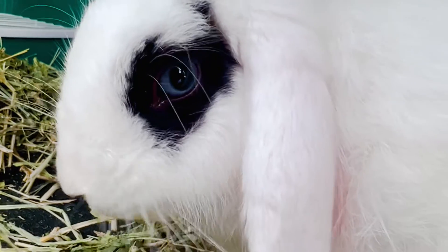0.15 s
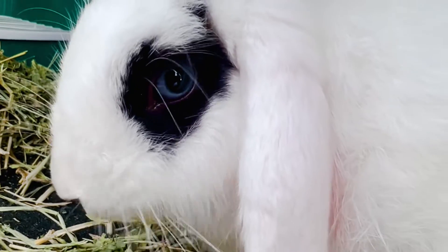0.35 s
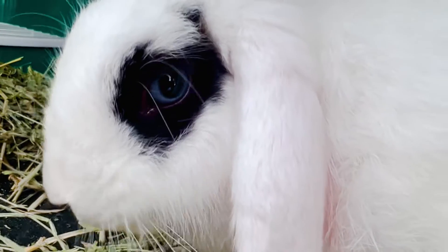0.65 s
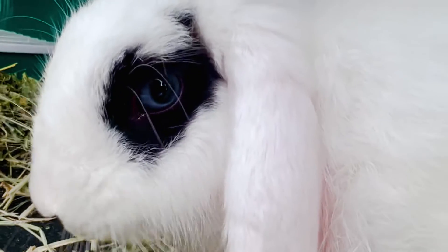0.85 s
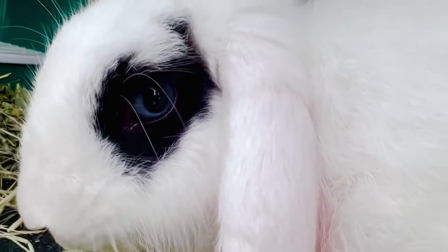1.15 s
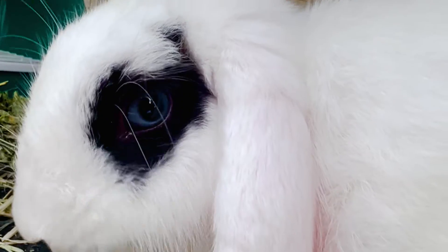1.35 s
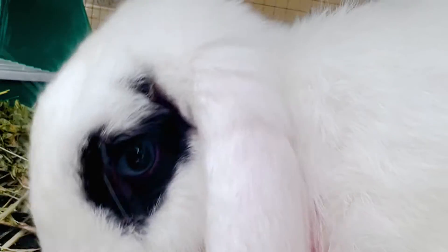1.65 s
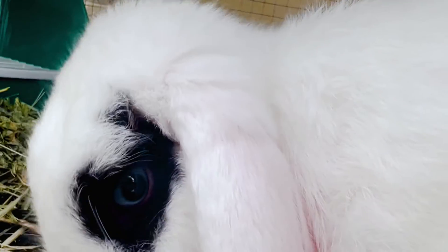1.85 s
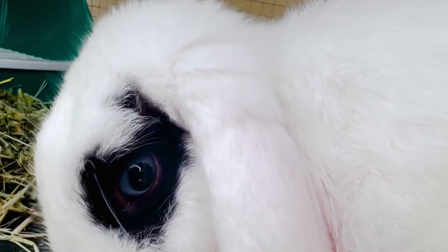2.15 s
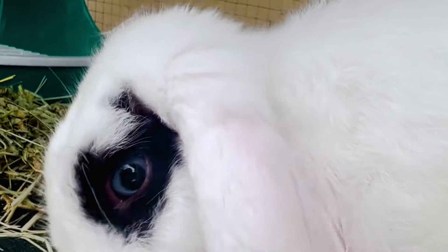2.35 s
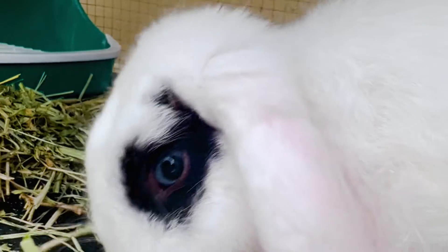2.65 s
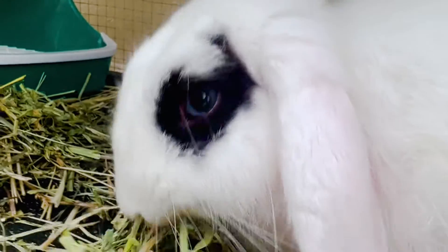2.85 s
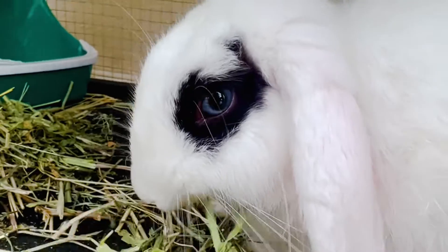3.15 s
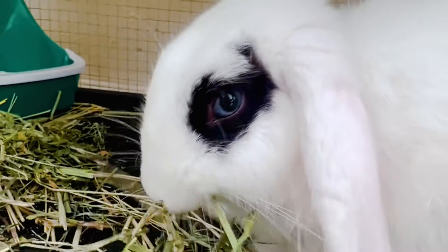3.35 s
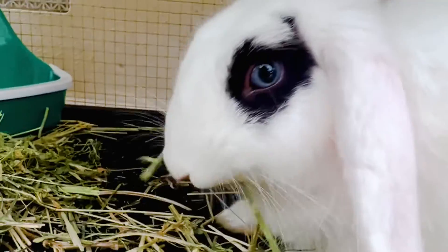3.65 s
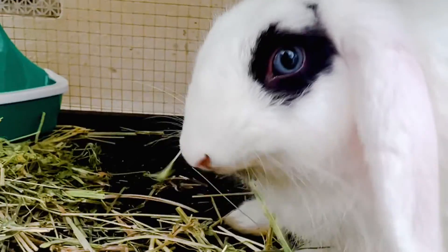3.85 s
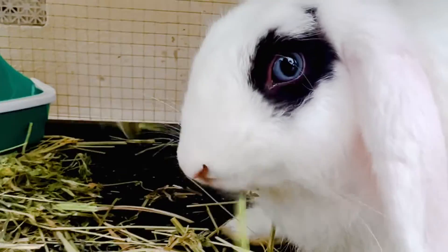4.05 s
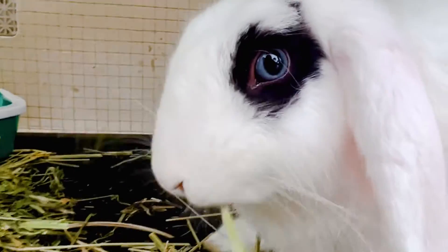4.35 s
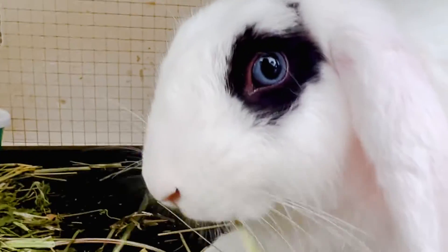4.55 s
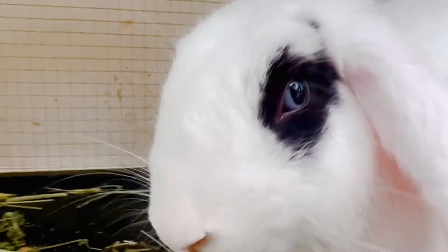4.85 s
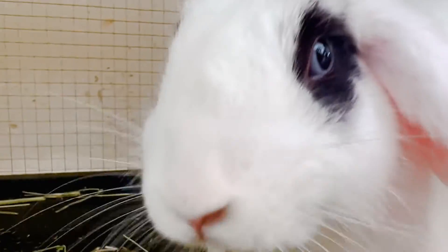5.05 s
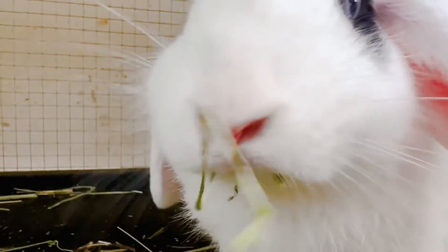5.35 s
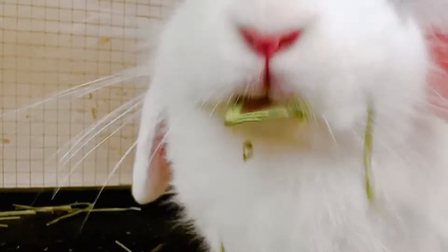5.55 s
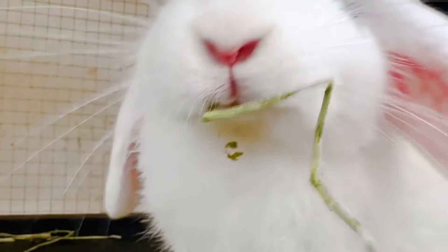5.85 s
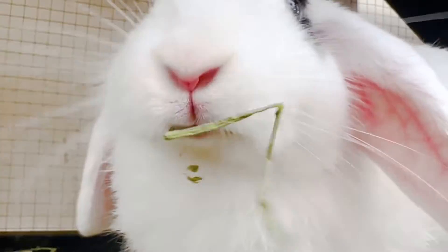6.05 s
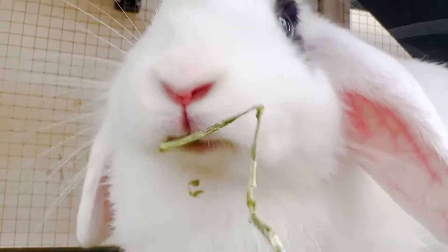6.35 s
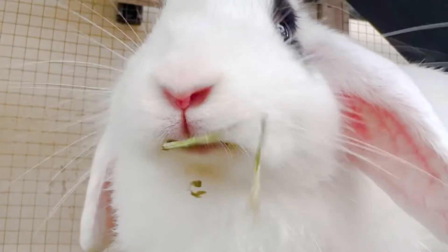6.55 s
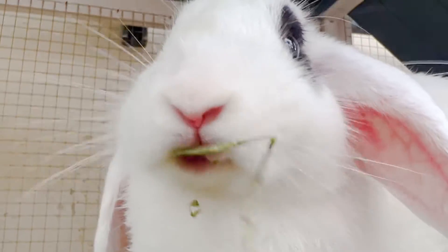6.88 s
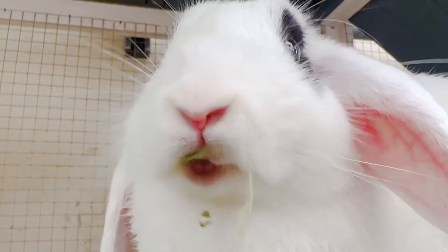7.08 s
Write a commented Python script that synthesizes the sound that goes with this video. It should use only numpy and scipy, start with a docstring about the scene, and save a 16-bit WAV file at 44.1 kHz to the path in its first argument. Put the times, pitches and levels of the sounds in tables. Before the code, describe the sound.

A rabbit chews dry stalks close by with faint, crisp clicks and crunches, growing stronger, over a steady low machine hum and soft airflow.

```python
"""A rabbit chews stalks close by, in stereo: noise bursts through stalk resonances make the snaps,
damped sines the clean cracks, band noise the crunches, dense tiny impulses the rustle of each bite.
Squeaks and breathy swishes are shaped noise; a few taps and thuds are decaying sines.
A machine hums and blows air behind: wandering tones over a narrow drone, rumble, airflow and hiss."""
import sys
import numpy as np
from scipy import signal
from scipy.fft import rfft, irfft, next_fast_len
from scipy.io import wavfile
from scipy.ndimage import uniform_filter1d, map_coordinates

SR = 44100
rng = np.random.default_rng(int(sys.argv[2]) if len(sys.argv) > 2 else 0)


def dump_mix(stems):
    """Bounce the given channels to the path in sys.argv[1] as a 16-bit WAV at rate SR."""
    frames = np.atleast_2d(stems).T  # one column per channel
    limited = np.clip(frames, -1, 1)  # hard clip at full scale
    pcm = np.round(limited * 32767).astype(np.int16)
    wavfile.write(sys.argv[1], SR, pcm)


N = 318402


def amp(db):
    """Decibels to amplitude factor."""
    return 10 ** (np.asarray(db) / 20)


def unit(x):
    """Scale to rms 1."""
    return x / np.sqrt(np.mean(x ** 2) + 1e-20)


def along(points, hz):
    """Interpolate (Hz, value) points on a log frequency axis."""
    point_hz, values = np.transpose(points)
    return np.interp(np.log(hz + 1), np.log(point_hz + 1), values)


def curves(rows):
    """One value per sample for each column after the time."""
    time_s, *columns = np.transpose(rows)
    return [np.interp(np.arange(N) / SR, time_s, column) for column in columns]


def wobble(knots_per_s, count=N):
    """A smooth random curve through normally distributed knots."""
    knots = rng.standard_normal(int(count * knots_per_s / SR) + 4)
    return map_coordinates(knots, [np.arange(count) * knots_per_s / SR])


def filtered(x, response):
    """Multiply the spectrum of x by a complex response of frequency."""
    m = next_fast_len(N + SR // 2)
    return irfft(rfft(x, m) * response(np.fft.rfftfreq(m, 1 / SR)), m)[..., :N]


def resonance(x, hz, width_hz, db):
    """A causal resonance, applied twice for steep skirts; width_hz is that of one pass."""
    def response(f):
        damping = 1j * f * width_hz
        return amp(db) * (damping / (hz * hz - f * f + damping)) ** 2
    return filtered(x, response)


# Stalk resonances: body, dull, main, sharp. Each row: centre in Hz, width in Hz, gain in dB.
FIBRE_MODES = [(2290, 1200, 9), (5580, 5500, 10.5), (8400, 3640, 1), (15600, 2000, 10)]
# Upper body resonance: centre in Hz, width in Hz, gain in dB.
UPPER_BODY_MODE = (3300, 3200, 5.6)
# Each row: time in s, share of the body power drive in its upper resonance (0-1).
UPPER_BODY_SHARE = [(0, 0.3), (2.2, 0.8), (2.4, 0.3), (2.63, 0.7), (3.0, 0.6), (3.33, 0), (3.68, 0.2),
                    (3.97, 1), (5.4, 0.06), (5.7, 0.5), (5.8, 0.2), (5.9, 0.4), (6.31, .6), (6.53, 0.3),
                    (6.75, 0.4), (7.22, 0.85)]


def fibres(drives):
    """Each excitation rings its own stalk resonance; the body moves between a low and a high one."""
    high = np.clip(curves(UPPER_BODY_SHARE)[0], 0, 1)
    body, *rest = drives
    excitations = [body * np.sqrt(1 - high), *rest, body * np.sqrt(high)]
    return sum(resonance(x, *mode) for x, mode in zip(excitations, [*FIBRE_MODES, UPPER_BODY_MODE]))


# Fibre breaks. Each row: start in s, relative level in dB, body part in dB, sharp part in dB.
FIBRE_SNAPS = [(0.35, -68, -2, -40), (0.435, -78, 5, -40), (0.624, -65, 5, -26), (.631, -59, 5, -26),
               (1.0888, -67, 10, -24), (1.096, -63, 7, -26), (1.314, -70, 11, -18), (1.5383, -73, 13, -9),
               (1.7653, -71.5, 11, -20), (1.95, -73, 12, -32), (1.958, -69, 16.5, -29),
               (2.163, -65, 13, -27), (2.177, -72, 22, -23), (2.3264, -65, 9, -16), (2.401, -73.5, 20, -25),
               (2.415, -50.5, -11, -7), (2.498, -62, -2, -32), (2.564, -48, -11, -17),
               (2.622, -67, 15.5, -15), (2.641, -68, 13, -11.5), (2.784, -70, -5, -10),
               (2.806, -62, -10, -15), (2.847, -49.5, -14, -16), (2.898, -51.5, -12, -20),
               (2.931, -55, -16, -16), (2.954, -54, -10, -17.5), (2.981, -53, -1, -23),
               (3.029, -46.5, -17, -17), (3.1046, -64, -10, -11), (3.327, -49, -14, 4),
               (3.3322, -45, -7, -12), (3.346, -55, -6, 3), (3.494, -57, 0, -27), (3.579, -66, -1, -45),
               (3.679, -71.5, 19, -26), (3.7352, -71, 11, -31), (3.966, -53, -1.5, -24),
               (4.66, -67, 4, -25), (4.766, -67, 6, -19), (4.78, -57, -2, -23), (4.874, -68, 0, -15),
               (4.9433, -54, -12, -19), (4.9818, -53, -5, -12), (5.1961, -60, -1, -10),
               (5.3384, -65, 3, 11), (5.402, -66.5, -8, -15), (5.4163, -46.5, -5, -16),
               (5.4356, -68, -9, -7), (5.465, -60, -12, -20), (5.623, -59, -11, -19),
               (5.642, -52, -20, -22), (5.666, -50.5, -12, -14), (5.673, -54, -12, -16),
               (5.702, -63, -9, -13), (5.782, -65, 5.5, -27), (5.8721, -47, -16, -14),
               (5.886, -77, -2, -13), (6.086, -54, -24, -2), (6.091, -42, -24, 2), (6.1006, -69, -8, -18),
               (6.3135, -46.5, -20, -25), (6.522, -54, -7, -33), (6.528, -48.5, -21, -33),
               (6.5617, -58, -10, -47), (6.7328, -55, -1, -25), (6.7421, -63, 2, -24),
               (6.745, -49, -15, -26), (6.756, -46.5, -15, -26), (6.7607, -69, -1, -15),
               (6.974, -54, -3, -22), (7.198, -58.5, -1, -18)]
# Each row: time in s, dull part in dB for a middling snap.
SNAP_DULLNESS = [(0, -7.5), (1.6, -6), (2.1, -22), (3.4, 0), (3.6, -18), (4.8, -18), (5.4, -21),
                 (7.22, -25)]
MIDDLING_DB, DULL_LOSS_DB_PER_DB = -61.5, 0.69  # louder snaps have a weaker dull part


def snaps():
    """Each break is a noise burst that dies in a few milliseconds, the body part more slowly."""
    t = np.arange(900) / SR
    drive = np.zeros((4, N + 900))
    t60_s = np.array([[.014], [.009], [.007], [.007]])  # body, dull, main, sharp
    rise = 1 - np.exp(-t / .002)
    shape = rise * (amp(-60 * t / t60_s) + 0.16 * amp(-60 * t / 0.031))  # with a weak slower tail
    for start_s, db, body_db, sharp_db in FIBRE_SNAPS:
        dull_db = np.interp(start_s, *np.transpose(SNAP_DULLNESS))
        dull_db -= DULL_LOSS_DB_PER_DB * (db - MIDDLING_DB)
        # the fibre tears in uneven steps
        splinters = amp(5 * np.repeat(rng.standard_normal(len(t) // 30), repeats=30))
        burst = unit(rng.standard_normal(shape.shape) * splinters * shape)
        burst *= np.sqrt(np.mean(shape ** 2))
        gains = amp(db + 10.0 + np.array([[body_db], [dull_db], [0], [sharp_db]]))
        first = round(start_s * SR)
        drive[:, first:first + len(t)] += gains * burst
    return fibres(drive[:, :N])


# Dry stalk cracks. Each row: start in s, relative level in dB, low mode in Hz, high mode in Hz,
# high over low in dB.
STALK_TICKS = [(0.5255, -39.5, 3000, 5000, -2), (.6632, -40.5, 5800, 8800, -2),
               (1.3448, -37.5, 6240, 9250, 0), (1.421, -57, 5500, 7000, 0),
               (1.5724, -47.5, 6000, 8900, -11), (1.97, -43, 3800, 7000, -5),
               (2.1768, -36.5, 3200, 5030, -4), (3.302, -49, 5500, 7050, -1), (3.3265, -43, 6200, 8000, 0),
               (4.814, -45, 4610, 9000, 5), (4.842, -54, 4470, 8500, 6), (4.912, -49, 5600, 7420, -3),
               (4.964, -47, 8160, 11000, 3), (5.0165, -55, 4000, 7950, 0), (6.298, -54.5, 5000, 8300, 4.5),
               (6.341, -55, 4340, 8300, 4)]
TICK_T60_S = .0022


def ticks():
    """Dry stalks crack cleanly: two sine modes, damped within a few milliseconds."""
    out, t = np.zeros(N + SR), np.arange(400) / SR
    for start_s, db, low_hz, high_hz, high_db in STALK_TICKS:
        ring = amp(-high_db / 2) * np.sin(2 * np.pi * low_hz * t)
        ring += amp(high_db / 2) * np.sin(2 * np.pi * high_hz * t)
        envelope = amp(db + 2.0 - 60 * t / TICK_T60_S) * (1 - np.exp(-t / .0003))
        out[round(start_s * SR):][:len(t)] += envelope * ring
    return out[:N]


# Molars crush a stalk. Each row: start in s, length in s, pitch in Hz, rms in dB before the swell.
MOLAR_CRUNCHES = [(2.646, .09, 7200, -78.5), (2.791, 0.11, 7800, -70.5), (2.83, .09, 5800, -73),
                  (2.94, .04, 7800, -69), (2.975, 0.03, 3600, -73), (3.02, 0.045, 5600, -76),
                  (3.099, .09, 6200, -79), (3.188, .09, 5600, -83), (6.74, .04, 4300, -75),
                  (3.326, 0.022, 2200, -56), (4.845, .05, 5400, -77), (4.918, .06, 6100, -73),
                  (5.612, 0.036, 8700, -71), (5.667, .04, 5300, -71), (5.674, 0.031, 7000, -77),
                  (5.774, .02, 2500, -66), (5.869, .03, 2480, -65.5), (6.078, .02, 2500, -69),
                  (6.09, 0.023, 4200, -75), (6.31, .02, 3000, -75), (6.515, 0.025, 3800, -80)]
CRUNCH_WIDTH_PER_HZ, CRUNCH_GRAIN_DB = .16, 5  # band width over pitch; unevenness


def crunches():
    """Grainy noise around the pitch of the crushed stalk, under a smooth swell."""
    out, t, f = np.zeros(N + SR), np.arange(4096) / SR, np.fft.rfftfreq(4096, 1 / SR)
    for start_s, length_s, hz, db in MOLAR_CRUNCHES:
        grit = rng.standard_normal(len(t)) * amp(CRUNCH_GRAIN_DB * wobble(300, count=len(t)))
        band = irfft(rfft(grit) / (1 + (2 * (f - hz) / (CRUNCH_WIDTH_PER_HZ * hz)) ** 2))
        swell = np.sin(np.pi * np.clip(t / length_s, 0, 1))
        out[round(start_s * SR):][:len(t)] += amp(db) * swell * unit(band)
    return out[:N]


# Faint rustle between bites. Each row: time in s, crackle control in dB.
HAY_CRACKLE = [(0, -90.5), (.6, -87), (.95, -103), (2, -101), (2.5, -97), (2.75, -86), (3.25, -87),
               (3.45, -83.5), (4.1, -86), (4.5, -79), (4.9, -83.5), (5.1, -83), (5.5, -84), (6, -81),
               (6.3, -85), (7.22, -84)]
# Each row: time of full pressure in s, crackle control in dB, hold in s.
JAW_BITES = [(.66, -82.5, 0), (0.838, -84.5, 0.019), (1.08, -81, 0.037), (1.317, -82.5, 0.043),
             (1.53, -79.5, 0.017), (1.786, -93, 0.0064), (1.977, -79, 0), (2.155, -83, 0),
             (2.331, -76.5, 0.012), (2.41, -83.5, 0), (2.562, -73.5, .08), (2.68, -86, 0.1),
             (2.804, -71.5, 0.21), (3.024, -74.5, 0.105), (3.14, -81.5, 0.12), (3.337, -68, 0.0066),
             (3.493, -76, 0.0093), (3.74, -82, 0), (3.835, -80, 0.038), (3.961, -75, .02), (4.14, -77.5, 0),
             (4.856, -74.5, .02), (4.937, -72, 0.036), (4.98, -74, 0.036), (5.2, -77, 0.025),
             (5.332, -74, 0.01), (5.408, -69, 0.027), (5.639, -66.5, 0), (5.689, -63.5, 0),
             (5.79, -74, 0.003), (5.862, -70.5, 0.035), (6.081, -72, 0.033), (6.312, -69.5, 0.017),
             (6.523, -70.5, 0.023), (6.742, -66, 0.017), (6.98, -67, 0), (7.2, -66, 0)]
CLOSE_DB_PER_S, OPEN_DB_PER_S = 398, 453  # slopes of the control, which rustle() stretches


def jaw():
    """Crackle control in dB: each bite swells, holds and fades over the hay's faint rustle."""
    t, (hay_db,) = np.arange(N) / SR, curves(HAY_CRACKLE)
    bites = []
    for full_s, db, hold_s in JAW_BITES:
        closing_db = CLOSE_DB_PER_S * (full_s - t)
        opening_db = OPEN_DB_PER_S * (t - full_s - abs(hold_s))
        bites.append(db - np.maximum(closing_db, opening_db).clip(0))
    return np.maximum(hay_db, np.max(bites, axis=0))


# Each row: time in s, dull part in dB, sharp part in dB.
RUSTLE_DRYNESS = [(0, 0, -5.5), (2.2, 1, 2), (3.2, -6.5, 1.5), (4.7, -8.5, -6), (5.2, -7, 1),
                  (5.7, -11.5, -5), (6, -13, -9), (7.22, -20, -10)]


def rustle():
    """Dense tiny breaks of uneven size, coming in clumps; faint ones are duller."""
    crackle_db = jaw()
    dull_db, sharp_db = curves(RUSTLE_DRYNESS)
    struck = rng.random(N) < 4000 / SR  # about 4000 breaks per s
    breaks = struck * rng.standard_normal(N) * amp(2.2 * rng.exponential(size=N))
    clumps = amp(2 * wobble(120) + 1.4 * wobble(35))
    breaks = unit(breaks * clumps) * amp(1.33 * (crackle_db + 71.5) - 68.0)
    body = breaks * amp(-1)
    dull = breaks * amp(dull_db + 2.3 * wobble(25))
    main = breaks * amp(2.2 * wobble(25))
    sharp = breaks * amp(sharp_db + .5 * (crackle_db + 69.5))
    return fibres([body, dull, main, sharp])


# A stalk slides over the teeth. Each row: start in s, length in s, pitch in Hz,
# rms in dB before the swell.
TOOTH_SQUEAKS = [(5.88, 0.059, 4050, -79), (6.0, 0.076, 5000, -83)]


def squeaks():
    """Short, rough whistles: noise in one narrow resonance under a smooth swell."""
    t, out = np.arange(N) / SR, np.zeros(N)
    for start_s, length_s, hz, db in TOOTH_SQUEAKS:
        swell = np.sin(np.pi * np.clip((t - start_s) / length_s, 0, 1))
        whistle = unit(resonance(rng.standard_normal(N), hz, width_hz=200, db=0))
        out += amp(db) * swell * whistle
    return out


# Soft breathy swishes. Each row: start in s, length in s, rms in dB before the swell,
# four band centres in Hz.
BREATHY_SWISHES = [(.55, 0.7, -70.5, 3750, 4500, 5060, 5900), (2.24, .33, -73, 3040, 3100, 3800, 5450),
                   (3.36, 0.49, -68.5, 2570, 4200, 4670, 5300), (3.8, .36, -67, 2950, 3200, 3550, 3900),
                   (6.66, 0.59, -73, 2900, 4150, 4860, 5660)]
SWISH_WIDTH_HZ, SWISH_BROAD = 270, .95  # band width; broad noise over the bands
SWISH_EDGE_S, SWISH_TILT_DB_PER_OCTAVE = 0.13, -6.5


def swishes():
    """Breathy noise that swells and fades, coloured by a few bands that come and go."""
    out = np.zeros((2, N + SR))
    t, f = np.arange(SR) / SR, np.fft.rfftfreq(SR, 1 / SR)
    for start_s, length_s, db, *bands_hz in BREATHY_SWISHES:
        shared = 0.55 * rng.standard_normal(SR)
        noise = rfft(rng.standard_normal((2, SR)) + shared)
        noise *= amp(SWISH_TILT_DB_PER_OCTAVE * np.log2(f / 4000 + .1))

        def band(hz, width_hz):
            return irfft(noise / (1 + (2 * (f - hz) / width_hz) ** 2)) / np.sqrt(width_hz)

        lines = sum(amp(3.5 * wobble(14, count=SR)) * band(hz, SWISH_WIDTH_HZ) for hz in bands_hz)
        broad = band(np.mean(bands_hz), np.ptp(bands_hz) + 1500)
        edge = np.clip(np.minimum(t, length_s - t) / SWISH_EDGE_S, 0, 1)
        swell = np.sin(np.pi / 2 * edge) ** 2
        breath = unit(unit(lines) + SWISH_BROAD * unit(broad))
        out[:, round(start_s * SR):][:, :SR] += amp(db) * swell * breath
    return out[:, :N]


# Each row: start in s, relative level in dB, lower mode in Hz, left over right in dB.
DRY_TAPS = [(3.268, -57, 577, -11), (3.58, -49.5, 990, -5), (3.68, -49.5, 805, 14), (4.765, -51.5, 830, 8)]


def taps():
    """Small dry contacts: two sine modes, quickly damped."""
    out, t = np.zeros((2, N + SR)), np.arange(900) / SR
    for start_s, db, hz, left_db in DRY_TAPS:
        ring = np.sin(2 * np.pi * hz * t) + 0.35 * np.sin(2 * np.pi * 1.87 * hz * t)
        ring *= amp(db + 9.0) * amp(-60 * t / .012)
        first = round(start_s * SR)
        out[:, first:first + len(t)] += amp([[left_db / 2], [-left_db / 2]]) * ring
    return out[:, :N]


# Each row: start in s, relative level in dB, start pitch in Hz, end pitch in Hz, t60 in s.
SOFT_THUDS = [(0.426, -23.5, 104, 103, 0.13), (1.102, -24, 89, 86, 0.087), (2.418, -27.5, 110, 104, 0.11),
              (5.424, -30, 198, 165, 0.13), (5.74, -35.5, 180, 172, 0.088),
              (7.005, -21.5, 1140, 143, 0.034)]


def thuds():
    """Soft low blows whose pitch sags as the high part arrives first."""
    out, t = np.zeros(N + SR), np.arange(SR // 5) / SR
    for start_s, db, start_hz, end_hz, t60_s in SOFT_THUDS:
        pitch_hz = end_hz + (start_hz - end_hz) * np.exp(-t / 0.0021)
        shape = amp(db - 60 * t / t60_s) * (1 - np.exp(-t * end_hz / 0.26)) ** 2 * 1.72
        out[round(start_s * SR):][:len(t)] += shape * np.sin(2 * np.pi * np.cumsum(pitch_hz) / SR)
    return out[:N]


def hutch(x):
    """A short, different answer of the walls for each side."""
    t = np.arange(SR // 10) / SR
    tail = rng.standard_normal((2, len(t))) * amp(-60 * t / 0.055)
    return signal.fftconvolve(x[None], tail / np.linalg.norm(tail[0]), axes=1)[:, :N]


# Left-right likeness of the machine's noise. Each row: frequency in Hz, correlation (0-1).
SIDE_LIKENESS = [(60, 0.98), (130, 0.91), (290, 0.76), (640, 0.039), (1400, 0.054), (3100, 0.11),
                 (8000, 0.085)]


def rush(spectrum, patchy_db):
    """Stereo noise of rms 1 with patches of random gain in time and frequency."""
    z = signal.stft(rng.standard_normal((2, N)), nperseg=512)[2]
    field = uniform_filter1d(rng.standard_normal(z.shape[1:]), size=5, axis=0)
    field = uniform_filter1d(field, size=12, axis=1)
    pair = signal.istft(z * amp(patchy_db * unit(field)), nperseg=512)[1][:, :N]

    def colour(hz):
        turn = np.arccos(np.clip(along(SIDE_LIKENESS, hz), -1, 1)) / 2
        return amp(along(spectrum, hz)) * [np.cos(turn), np.sin(turn)]

    mid, side = filtered(pair, colour)
    return unit(np.array([mid + side, mid - side]))


# Motor tones. Each row: pitch in Hz, mean starting rms in dB, wander scale in Hz, drift in dB per s.
MOTOR_TONES = [(119.6, -43.5, .8, -.6), (239.6, -50, .15, -.2)]
# Noise spectra. Each row: frequency in Hz, relative density in dB per Hz.
DRONE_SPECTRUM = [(25, -51), (38, -23), (50, -2), (58, -0.5), (66, -15), (78, -21), (100, -120)]
RUMBLE_SPECTRUM = [(40, -12), (70, -1.5), (86, 1), (105, -6), (135, -4.5), (155, -18), (175, -7.5),
                   (215, -8), (255, -9.5), (281, -22.5), (420, -39), (600, -120)]
AIRFLOW_SPECTRUM = [(150, -28.5), (260, -4.5), (313, -9.5), (344, -8), (430, -14.5), (463, -12),
                    (499, -14.5), (1020, -18.5), (1170, -22.5), (1450, -21), (1800, -24.5), (2400, -32.5),
                    (3120, -48.5), (5280, -120)]
LOW_HISS_SPECTRUM = [(1500, -49), (2400, -3.5), (2800, 0.5), (3500, -6), (4300, -9.5), (6000, -28),
                     (9000, -120)]
HISS_SPECTRUM = [(2500, -47.5), (3800, -15.5), (4600, -0.5), (6000, 1.5), (7000, -3.5), (8300, -9),
                 (10000, -20.5), (11900, -21.5), (12300, -43), (16000, -50.5)]
# Drone level. Each row: time in s, relative level in dB.
DRONE_LEVEL = [(0, -35), (.14, -46), (.48, -35), (.74, -46), (.92, -36.5), (1.2, -41.5), (1.93, -39),
               (2.11, -53), (2.35, -41.5), (3.38, -38), (3.46, -47), (3.76, -35), (4.26, -46.5),
               (4.38, -34), (4.66, -39.5), (5.13, -40.5), (5.51, -45), (5.87, -40.5), (6.6, -44),
               (6.92, -40.5), (7.06, -36.5), (7.22, -47)]
# Each row: time in s, relative rumble level in dB, relative airflow level in dB.
BLOWER_LEVELS = [(0, -44.5, -53), (1.8, -43, -52.5), (3.8, -47, -53.5), (4.3, -47, -53.5),
                 (5.1, -45.5, -54), (6.4, -47.5, -55.5), (7.22, -49, -53.5)]
# Each row: time in s, relative low hiss level in dB, relative high hiss level in dB.
HISS_LEVELS = [(0, -76, -82), (.48, -77, -81), (1.33, -76, -78.5), (2.11, -75, -75.5), (2.59, -73.5, -75),
               (2.93, -75, -70), (3.3, -75, -78), (4.3, -77, -82), (4.95, -79, -78.5), (5.51, -80, -84),
               (6.4, -82, -86), (7.22, -81, -84)]


def machine():
    """Motor tones of slightly wandering pitch and level over a narrow drone, rumble, airflow and hiss."""
    t = np.arange(N) / SR
    (drone_db,), (rumble_db, flow_db) = curves(DRONE_LEVEL), curves(BLOWER_LEVELS)
    low_hiss_db, hiss_db = curves(HISS_LEVELS)
    tones = np.zeros(N)
    for hz, db, wander_hz, drift_db_per_s in MOTOR_TONES:
        level = amp(db + drift_db_per_s * t + 1.96 * wobble(5)) * np.sqrt(2)
        tones += level * np.sin(2 * np.pi * np.cumsum(hz + wander_hz * wobble(3.7)) / SR)
    shaft = np.sin(2 * np.pi * np.cumsum(57.5 + 3 * wobble(7)) / SR)  # the rotor turns unevenly
    drone = amp(drone_db) * (1.29 * shaft + 0.82 * rush(DRONE_SPECTRUM, patchy_db=-1.2))
    rumble = amp(rumble_db + 4.0) * rush(RUMBLE_SPECTRUM, patchy_db=1.06)
    airflow = amp(flow_db + 3.5) * rush(AIRFLOW_SPECTRUM, patchy_db=1.0)
    low_hiss = amp(low_hiss_db + 5.0) * rush(LOW_HISS_SPECTRUM, patchy_db=1.1)
    hiss = amp(hiss_db + 2.0) * rush(HISS_SPECTRUM, patchy_db=1.1)
    return tones + drone + rumble + airflow + low_hiss + hiss


# Half shares of a left-right difference. Each row: factor for one side, left first.
SIDE_SHARES = np.array([[1], [-1]]) / 2


def lagged(x, points):
    """A phase lag of left behind right, half on each side."""
    return filtered(x, lambda hz: np.exp(-1j * SIDE_SHARES * np.interp(hz, *np.transpose(points))))


# Room noise. Each row: frequency in Hz, lag of left behind right in radians.
MACHINE_LAG = [(340, 0), (1000, 1), (1720, 2.7), (2840, 5.1), (3960, 5.7), (8200, 6.3)]


def scene():
    """Chewing and its wall reflections, swishes, contacts and the machine."""
    chewing = snaps() + ticks() + crunches() + rustle() + squeaks()
    walls = amp(-11) * hutch(chewing)
    return chewing + walls + swishes() + taps() + thuds() + lagged(machine(), MACHINE_LAG)


# Treble. Each row: frequency in Hz, lag of left behind right in radians.
TREBLE_LAG = [(8550, 0), (16000, 13)]
# Each row: frequency in Hz, left over right in dB.
LEFT_OVER_RIGHT = [(60, 0.06), (200, 2), (700, 0), (2400, 1), (5500, 4), (7800, 5.5), (8400, -1.5),
                   (16000, 2)]
# Microphone colour. Each row: frequency in Hz, gain in dB.
MICROPHONE_COLOUR = [(9500, -1), (11000, 3.5), (13000, -8), (15500, -1)]
MONO_HZ, TOP_HZ = 8200, 16050  # one signal above; band limit


def record(dry):
    """Two ports of unequal colour; treble is one signal spread by phase; bass cut and band limit."""
    stereo = filtered(dry, lambda hz: hz < MONO_HZ)
    treble = filtered(dry[0], lambda hz: hz >= MONO_HZ)
    merged = stereo + lagged(treble, TREBLE_LAG)

    def colour(hz):
        top_cut = np.clip((TOP_HZ - hz) / 300, 0, 1) ** 2
        bass_cut = hz ** 6 / (hz ** 6 + 31 ** 6)
        gain_db = SIDE_SHARES * along(LEFT_OVER_RIGHT, hz) + along(MICROPHONE_COLOUR, hz)
        return amp(gain_db) * bass_cut * top_cut

    return filtered(merged, colour)


dry = scene()
out = record(dry)
dump_mix(out)
```